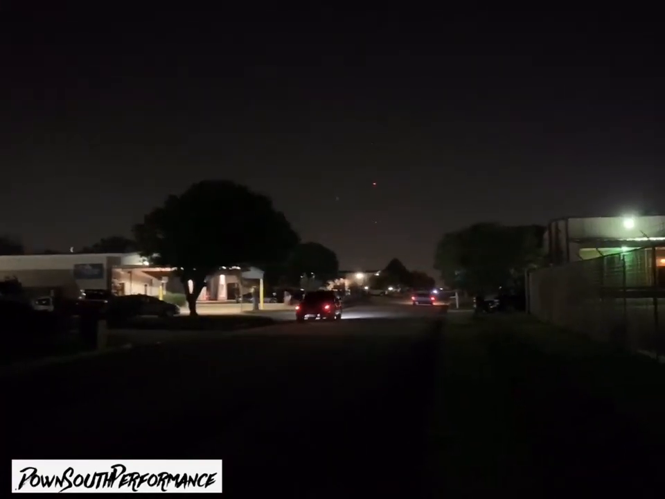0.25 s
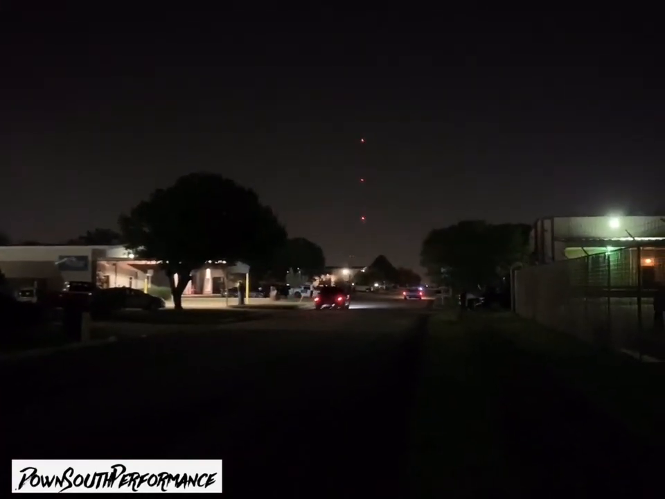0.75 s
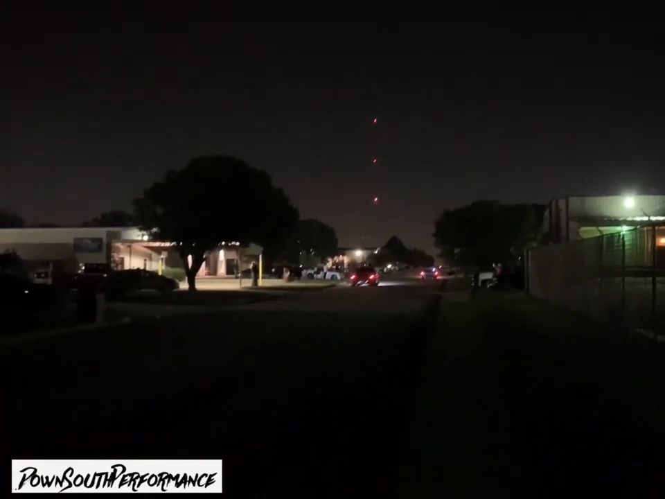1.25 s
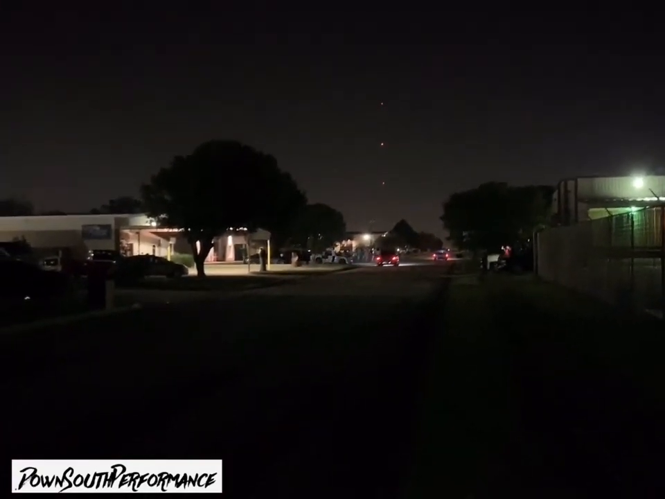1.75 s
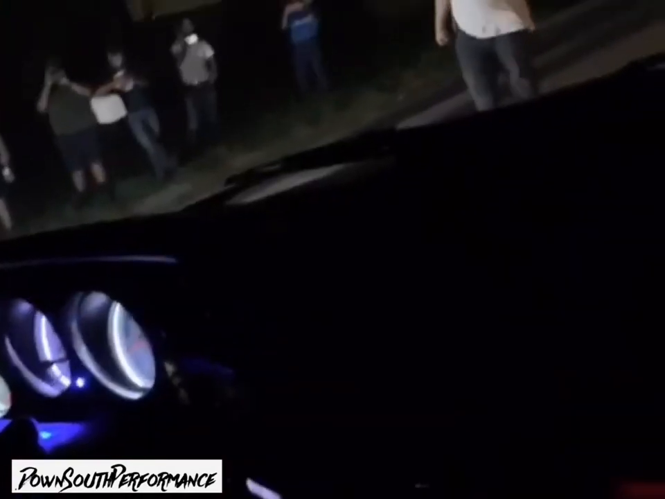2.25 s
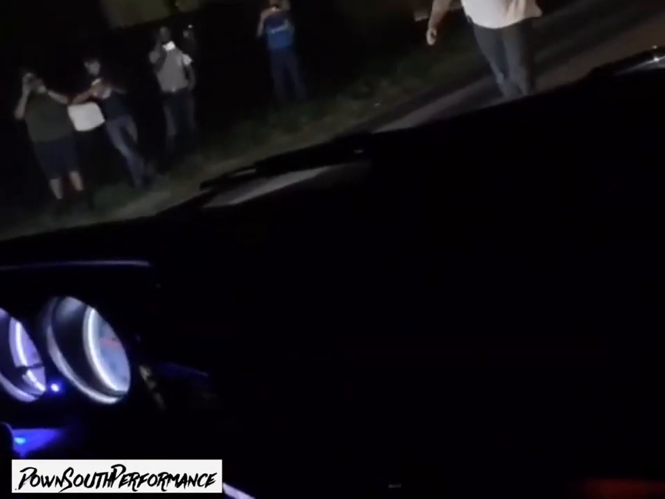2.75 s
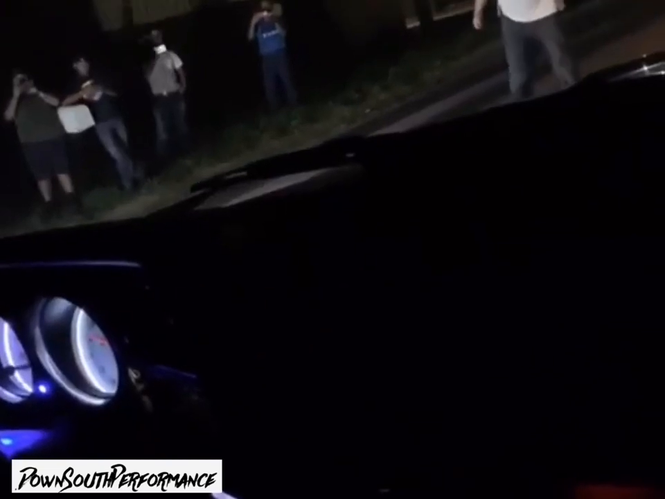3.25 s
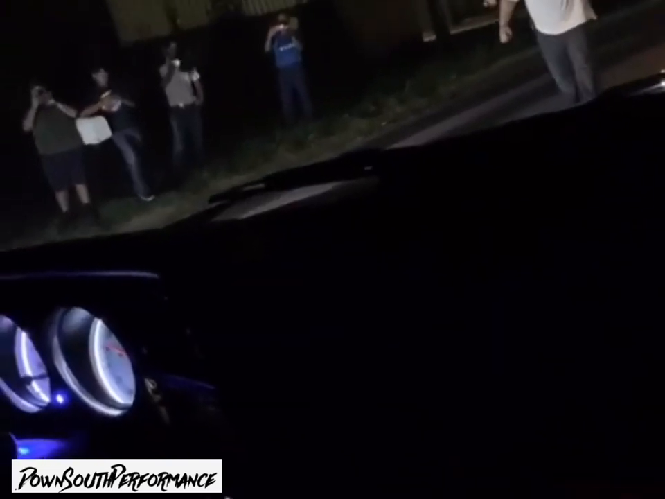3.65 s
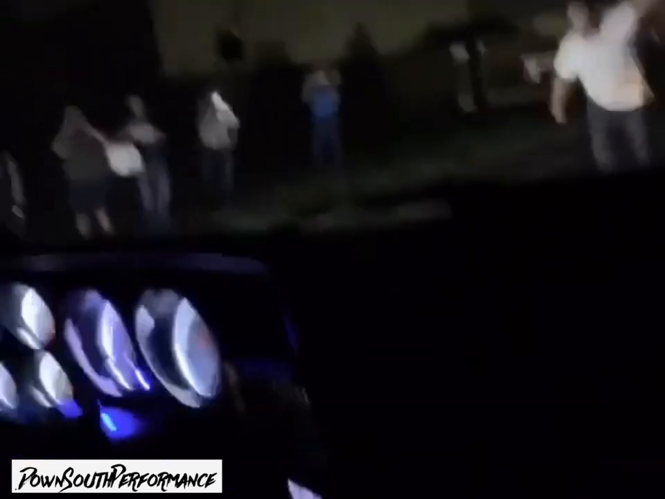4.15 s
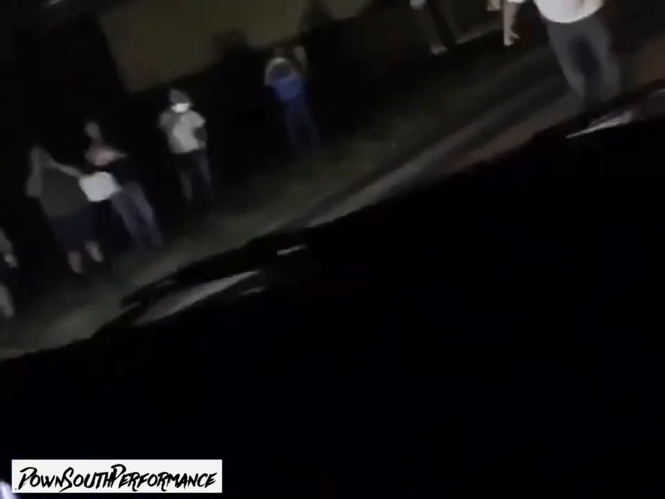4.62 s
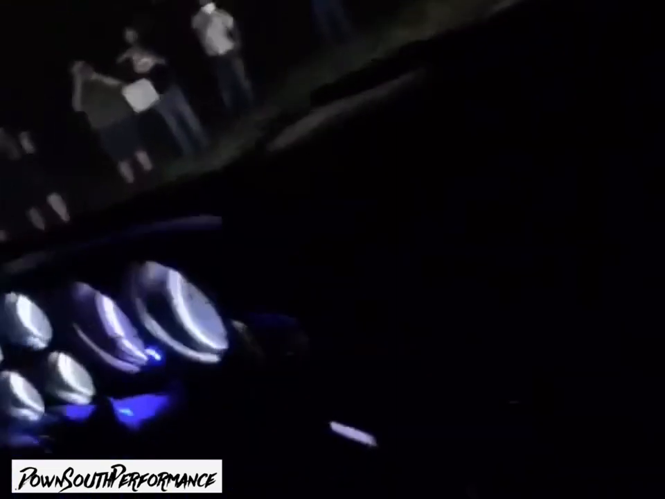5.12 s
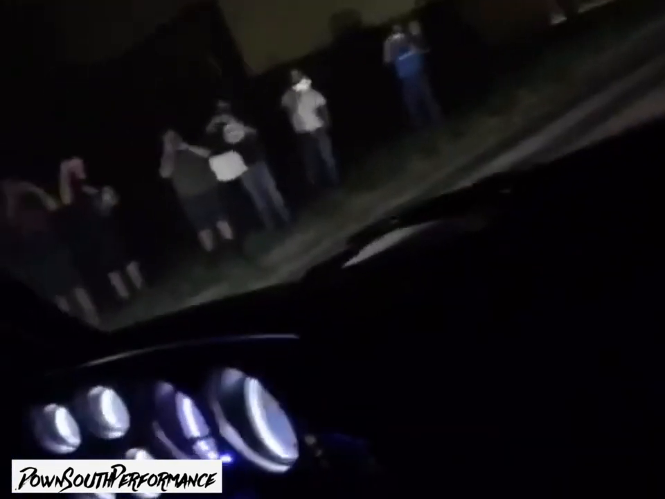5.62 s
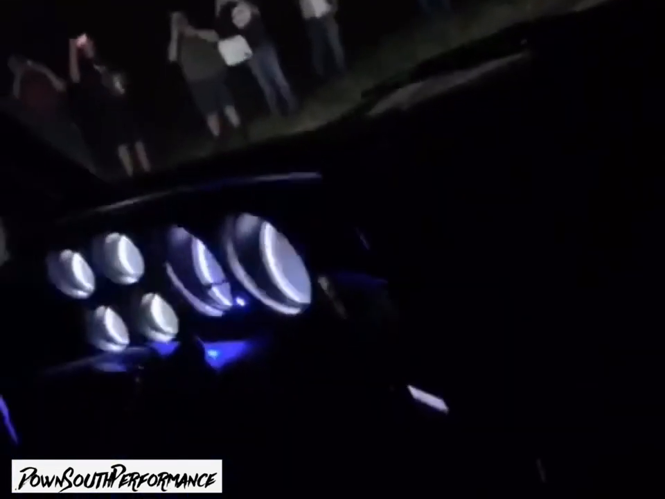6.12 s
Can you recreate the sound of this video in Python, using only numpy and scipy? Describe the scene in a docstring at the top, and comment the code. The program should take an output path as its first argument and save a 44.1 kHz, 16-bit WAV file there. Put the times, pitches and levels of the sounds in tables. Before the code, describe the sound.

Two scenes. First a quiet night street: a far truck's buzzing exhaust pulls away, reflected off buildings, with insects chirring thinly. After a split-second gap, the microphone is inside a car: a heavy V8 climbs quickly with deep, uneven throbbing, swelling as it hits resonances, then dips slightly, rises again and holds steady while intake hiss thins and a loose metal part clinks.

```python
"""An eight-cylinder engine, heard in mono inside a cabin, winds up from low speed and is then held.
Its low notes are sine waves on the engine cycle; air noise and firing clicks ring in panels and
in high resonances. Before it, ahead of a short silence between the two scenes, a far eight-cylinder truck
pulls away in stereo: sine waves and a buzz of clicks, among street roar and insect treble of filtered noise.
Two short metal clinks join the cabin, and a fast limiter holds back the loudest peaks."""
import sys
import numpy as np
from scipy import signal
from scipy.fft import rfft, irfft
from scipy.io import wavfile
from scipy.ndimage import uniform_filter1d, minimum_filter1d

SR = 44100
rng = np.random.default_rng(int(sys.argv[2]) if len(sys.argv) > 2 else 0)


def voltage_ratio(level):
    """Linear amplitude factor for a level in decibels (scalar or array-like)."""
    return 10 ** (np.asarray(level, float) / 20)


def waveform_to_disk(signal):
    """Save audio, clipped to [-1, 1], as 16-bit WAV at the path in sys.argv[1]."""
    frames = np.transpose(np.atleast_2d(signal))
    scaled = np.clip(frames, -1, 1) * 32767
    samples = np.round(scaled).astype(np.int16)
    wavfile.write(sys.argv[1], SR, samples)


N = 281358

# Loudness of the street over time, relative: [t/s, roar level/dB, treble level/dB]
STREET_LEVELS = [(0.0, -32.5, -42.5), (0.264, -36.5, -44.5), (0.364, -43, -50.5), (0.694, -44.5, -52),
                 (0.85, -40.5, -49), (1.4, -39, -47), (1.67, -39.5, -45.5), (1.7, -43.5, -51),
                 (1.98, -37.5, -45)]
# Tone colour of the street, relative: [f/Hz, level/dB per Hz]
STREET_COLOUR = [(25, -21), (60, -19), (110, -3.5), (250, -5), (600, -11.5), (760, -5.5), (1000, -7.5),
                 (1250, -7), (1500, -9), (2000, -10.5), (2400, -16), (3000, -14.5), (4200, -28),
                 (7200, -30), (8300, -28), (9200, -30.5), (10100, -43), (11000, -47.5), (11900, -47),
                 (12600, -46), (14200, -49), (15500, -72.5)]
# Change in level of the street roar above about 1.2 kHz and of the truck's buzz: [t/s, level/dB]
STREET_RASP = [(0, -3.5), (.12, -2.5), (.18, 2.5), (.25, 0), (.36, 2.5), (.52, 4), (.62, -1.5), (.9, 3),
               (1.25, -1.5), (1.45, 1), (1.65, 2.5), (1.78, 1.5), (1.98, 2)]


def rms_one(x):
    """Scale to an average strength (rms) of 1."""
    return x / np.sqrt(np.mean(x ** 2) + 1e-20)


def in_time(rows):
    """Turn each column of a time table into a curve with one value a sample."""
    s, *columns = np.transpose(rows)
    return [np.interp(np.arange(N) / SR, s, c) for c in columns]


def at_hz(points, hz):
    """Read a [f/Hz, value] table on a log frequency axis."""
    table_hz, values = np.transpose(points)
    return np.interp(np.log(np.maximum(hz, 1)), np.log(table_hz), values)


def drift(rate):
    """Slow random wandering with spread 1: noise smoothed above rate (Hz)."""
    hop = 40  # samples between the points that are computed
    r = np.exp(-2 * np.pi * rate * hop / SR)
    noise = rng.standard_normal(N // hop + 2002)
    slow = signal.lfilter([1], [1, -2 * r, r * r], noise)[2000:]  # skip the settling time
    return np.interp(np.arange(N) / hop, np.arange(len(slow)), rms_one(slow))


def coloured(x, spectrum):
    """Shape the spectrum of a signal by a [f/Hz, level/dB] table; rms 1."""
    hz = np.fft.rfftfreq(N, 1 / SR)
    return rms_one(irfft(rfft(x) * voltage_ratio(at_hz(spectrum, hz + 1)), N))


def band(x, low_hz, high_hz):
    """Let only the frequencies between two limits through."""
    return signal.sosfilt(signal.butter(2, [low_hz, high_hz], "band", fs=SR, output="sos"), x)


def lift(x, low_hz, high_hz, db):
    """Raise or lower one broad band."""
    middle = signal.lfilter(*signal.butter(1, [low_hz, high_hz], "band", fs=SR), x)
    return x + (voltage_ratio(db) - 1) * middle


def rings(x, modes, wander_db):
    """The signal plus its ringing in each resonance, each swelling slowly."""
    out = x.copy()
    for hz, width, db in modes:
        r = np.exp(-np.pi * width / SR)
        feedback = [1, -2 * r * np.cos(2 * np.pi * hz / SR), r * r]
        ring = signal.lfilter([(1 - r * r) / 2, 0, (r * r - 1) / 2], feedback, x)
        out += voltage_ratio(db + wander_db * drift(1.04)) * ring
    return out


def scattered(x, decay_s):
    """Dense reflections: each click becomes dying noise; three paths take turns at steady total power."""
    tails = rng.standard_normal((3, 8000)) * np.exp(-np.arange(8000) / (decay_s * SR))
    shares = voltage_ratio(np.array([5 * drift(3) for _ in tails]))
    shares = shares / np.sqrt((shares ** 2).sum(axis=0))
    return sum(signal.fftconvolve(x * share, tail)[:N] for share, tail in zip(shares, tails))


def orders(cycle, levels, waver_db, waver_rad, rate):
    """Sines on (half) multiples of the engine cycle; uneven burning wavers each in level and phase."""
    out = np.zeros(N)
    for k, db in levels:
        phase = 2 * np.pi * (round(2 * k) / 2 * cycle + rng.random()) + waver_rad * drift(rate)
        out += np.sqrt(2) * voltage_ratio(db + waver_db * drift(rate)) * np.sin(phase)
    return out


def firings(turns, uneven_db, spread_s, jitter_db):
    """A click a firing; eight unequal pipes and slowly changing strengths keep every half order alive."""
    timing_slop_s = .00006
    beat = np.cumsum(turns) / SR * 4  # four firings a crank turn
    number = np.arange(1, int(beat[-1]))
    cylinder = number % 8
    at = np.interp(number, beat, np.arange(N))
    strengths = np.array([drift(0.56)[at.astype(int)] for _ in range(8)])[cylinder, number - 1]
    delay_s = spread_s * rng.random(8)[cylinder] + timing_slop_s * rng.random(len(at))
    at = np.minimum(at + SR * delay_s, N - 2)
    size = voltage_ratio(uneven_db * strengths + jitter_db * rng.standard_normal(len(at)))
    # share each click between the two samples nearest to its exact time
    clicks, part = np.zeros(N), at % 1
    np.add.at(clicks, at.astype(int), size * (1 - part))
    np.add.at(clicks, at.astype(int) + 1, size * part)
    return clicks


def far_throttle():
    """The truck's throttle: full (1) at first, then eased to 0."""
    ease_start_s, ease_length_s = 0.23, 0.066
    return np.clip(1 - (np.arange(N) / SR - ease_start_s) / ease_length_s, 0, 1)


def snarl(x):
    """At full throttle the far exhaust rings brighter around 2 kHz."""
    return lift(rms_one(x), 1800, 2200, db=7 * far_throttle())


def street():
    """Roar scattered off the buildings comes in drifting patches; insects chirr in the treble."""
    # Likeness of the two microphone ports: [f/Hz, likeness (1 = the same)]
    likeness = [(60, .99), (500, .997), (1100, .975), (2300, .84), (4700, 0.3), (9000, 0.85)]
    # Left level against right level: [f/Hz, level/dB]
    tilt = [(60, -1.0), (170, 0.0), (460, 0.0), (1270, 2.0), (3500, 0.5), (9660, -2.0)]
    roar_db, treble_db = in_time(STREET_LEVELS)
    rasp_db, = in_time(STREET_RASP)
    mid, side = (coloured(w, STREET_COLOUR) for w in rng.standard_normal((2, N)))
    roar, upper, treble = 0, 0, 0
    edges = 35 * 2 ** np.arange(0, 8.9, 1 / 3)  # third-octave bands, Hz
    for low, high in zip(edges, edges[1:]):
        hz = np.sqrt(low * high)
        alike, lean = np.clip(at_hz(likeness, hz), -1, 1), at_hz(tilt, hz) / 2
        common = np.sqrt(1 + alike) * band(mid, low, high)
        opposite = np.sqrt(1 - alike) * band(side, low, high) * [[1], [-1]]
        pair = (common + opposite) * voltage_ratio(np.array([[lean], [-lean]]))
        if hz < 1250:
            roar = roar + pair * voltage_ratio(0.5 * drift(1.4))
        elif hz < 4500:
            upper = upper + pair * voltage_ratio(1.3 * drift(5))
        else:
            treble = treble + pair
    roar = voltage_ratio(roar_db + 6.5) * rms_one(roar)
    upper = voltage_ratio(roar_db + 4.5 + rasp_db + 3.0 * drift(3.2)) * snarl(upper)
    treble = voltage_ratio(treble_db + 1.3 * drift(26.0)) * rms_one(treble)
    return roar + upper + treble


def far_truck():
    """Clean exhaust orders, a buzz of firings above them, and a note that sags through a gear change."""
    # Engine speed: [t/s, crank turns per s]
    far_speed = [(0, 39.1), (.2, 39), (.33, 38.4), (.5, 37.2), (.64, 36.7), (.83, 36.9), (1.32, 37.93),
                 (1.98, 39.3)]
    # Strong orders, relative: [order, level at eased throttle/dB, gain at full throttle/dB]
    strong_orders = [(3, -43.5, -3.5), (5, -37.5, 6), (8, -45, 17.5), (11, -63.5, 21), (13, -45, 10.5),
                     (16, -41, 4.5), (4, -54.5, 18.5), (6, -38.5, 5.5), (14, -52, 15)]
    # Weaker orders, relative: [order, level/dB]
    weak_orders = [(2.0, -54), (7.0, -40), (9.0, -55.5), (12.0, -49), (15.0, -46), (17.0, -46), (18.0, -41),
                   (21.0, -45.5), (23.0, -47.5), (26.0, -64), ]
    # Second engine note, which sags and climbs again, relative: [t/s, f/Hz, level/dB]
    gear_change = [(0, 545, -42), (.2, 528, -41), (.3, 481, -37), (.4, 435, -36), (.5, 408, -42.5),
                   (.64, 403.7, -39.5), (.83, 409, -40), (1.32, 420, -40), (1.98, 431, -33)]
    turns, = in_time(far_speed)
    cycle = np.cumsum(turns) / SR
    throttle = far_throttle()
    roar_db = in_time(STREET_LEVELS)[0]
    note_hz, note_db = in_time(gear_change)
    note = orders(np.cumsum(note_hz) / SR, [(1, note_db)], waver_db=1.5, waver_rad=.3, rate=8)
    strong_levels = [(k, db + full * throttle) for k, db, full in strong_orders]
    strong = orders(cycle, strong_levels, waver_db=2.5, waver_rad=.35, rate=12)
    weak = orders(cycle, weak_orders, waver_db=2.0, waver_rad=1.0, rate=19.0)
    weak = weak * voltage_ratio(0.36 * (roar_db + 35.5))  # partly follows the street roar
    clicks = firings(turns, uneven_db=-0.5, spread_s=0.00442, jitter_db=2.0)
    buzz = band(coloured(scattered(clicks, decay_s=0.18), STREET_COLOUR), 870, 4100)
    buzz = snarl(buzz) * voltage_ratio(in_time(STREET_RASP)[0])
    return strong + weak + note + voltage_ratio(roar_db - 4) * buzz


def road_bounce(x):
    """A bounce off the road: a softer, later copy, which cuts evenly spaced dips into the spectrum."""
    lag_s, strength = .00204, .42
    return x + strength * np.roll(x, round(lag_s * SR), axis=1)


def clink():
    """A loose metal part chatters: a short burst of noise rings in a few modes."""
    # Clinks, relative: [t/s, level/dB]
    clinks = [(4.429, -12.5), (5.55, -27.5)]
    # Modes of the metal part: [f/Hz, width/Hz, level/dB]
    metal_modes = [(2070, 83, 2), (2250, 80, -1.5), (3810, 54, 4.5), (6070, 73, -9)]
    hold_s, fade_s = .02, .009
    out = 0
    for s, db in clinks:
        since = np.arange(N) / SR - s
        shape = (since > 0) * np.exp(-np.maximum(since - hold_s, 0) / fade_s)
        burst = voltage_ratio(db) * shape * rng.standard_normal(N) + 1e-18
        out = out + rings(burst, metal_modes, wander_db=0) - burst  # keep the ringing alone
    return out


def strands(cycle):
    """Single high engine orders swell up, hold and fade."""
    # Orders that sing out for a while, relative: [order, start t/s, length/s, level/dB]
    singing = [(33, 2.4, 0.19, -40), (27, 3.7, 0.61, -42.5), (32, 4.5, .3, -40), (26.5, 4.72, 0.38, -35.5),
               (22, 4.5, 0.46, -40.5), (20, 6.5, 0.96, -45.5), (30.5, 5.15, .5, -42),
               (36.6, 4.7, 0.47, -43), (27.5, 4.8, 0.49, -45), (23.5, 5.1, 0.54, -41)]
    fade_s = .06
    t = np.arange(N) / SR
    out = 0
    for k, s, length, db in singing:
        shape = np.clip(np.minimum(t - s, s + length - t) / fade_s, 0, 1)
        out = out + shape * orders(cycle, [(k, db)], waver_db=2.5, waver_rad=.6, rate=14)
    return out


def intake_and_panels(turns, cycle, load_db, rasp_db):
    """Intake air and firings ring in the cabin panels, and in high resonances that fade as load drops."""
    # Tone colour of air noise and firings, relative: [f/Hz, level/dB per Hz]
    intake = [(400, -4), (600, 1.5), (800, -1.5), (1050, -4.5), (1400, -6), (1750, -7.5), (2100, -7.5),
              (2700, -10.5), (3500, -13.5), (5000, -17.5), (8600, -15), (9600, -7)]
    # Panel resonances: [f/Hz, width/Hz, level/dB]
    panel_modes = [(790, 35, -3), (895, 40, -9), (960, 40, 0), (1025, 200, 0), (1052, 40, -3),
                   (1145, 35, -4), (1220, 50, -1), (1362, 35, 1), (1490, 40, -2), (1615, 50, 2),
                   (1800, 40, -2)]
    # High resonances that pick out engine harmonics, before the load turns them down:
    # [f/Hz, width/Hz, level/dB]
    high_modes = [(1885, 30, 4), (2178, 30, 4), (2826, 35, 3), (3826, 50, 1)]
    growl = firings(turns, uneven_db=3, spread_s=.004, jitter_db=1.2)
    growl = rms_one(scattered(growl, decay_s=.018))
    throb = 1 + 0.07 * np.sin(2 * np.pi * cycle) + 0.034 * drift(10.0)  # air breathes once a turn
    air = rng.standard_normal(N) * throb + voltage_ratio(1.5) * band(growl, 800, 3000)
    air = coloured(air, intake)
    air = signal.sosfilt(signal.butter(2, 400, "high", fs=SR, output="sos"), air)
    for low in (500, 800, 1300, 2100, 3400, 5500):  # Hz; each band swells on its own
        air = lift(air, low, 1.6 * low, 1.5 * drift(5))
    # below -4.5 dB of load the high ringing falls 2.5 dB for each dB
    high_ringing = rings(air, high_modes, wander_db=0.5) - air
    high_ringing = voltage_ratio(2.5 * np.minimum(load_db + 4.5, 0)) * high_ringing
    panels = rms_one(rings(air, panel_modes, wander_db=2.2) + high_ringing)
    return lift(panels, 1350, 3200, rasp_db)


def cabin_air(cycle, load_db, below_held, lope):
    """Weaker engine orders and low rumble ring in the air of the cabin."""
    # Weaker orders at held speed and 0 dB load, before the air modes: [order, level/dB]
    weak_orders = [(1.5, -31.5), (2.0, -37), (3.5, -34.5), (4.5, -44), (6.5, -36.5), (10.5, -44.5),
                   (11.0, -44), (11.5, -39.5), (12.5, -47), (13.5, -46.5), (14.0, -49.5)]
    # Tone colour of the rumble, relative: [f/Hz, level/dB per Hz]
    rumble_colour = [(20, -37), (40, -2.5), (130, -15.5), (210, -11.5), (340, -18.5), (480, -16),
                     (650, -10)]
    # Air modes: [f/Hz, width/Hz, level/dB]
    air_modes = [(122, 78, 0), (159.5, 15, 9), (205.6, 25, 8.5), (315, 37.4, 9.5), (410, 38, 9)]
    weak = orders(cycle, weak_orders, waver_db=4.5, waver_rad=0.43, rate=2.56)
    weak = weak * voltage_ratio(load_db - 0.13 * below_held)
    rumble = rms_one(band(coloured(rng.standard_normal(N), rumble_colour), 41, 338))
    rumble = rumble * voltage_ratio(load_db - 24.5 + 1.5 * drift(3) + .45 * lope)
    return rings(weak + rumble, air_modes, wander_db=4.5)


def boom_db(hz):
    """Gain of the steep resonances at a moving frequency; it falls away quickly below the lowest."""
    # Exhaust and body resonances: [f/Hz, width/Hz, level/dB]
    booms = [(40.2, 18, 0), (87, 41, -1.5), (122.4, 19.7, 13), (187.9, 9.3, 8.5), (203.9, 18, 5.5),
             (285, 92, -7.5), (320.3, 9, 10), (346.7, 13.8, 12.5), (411.4, 22.5, 13.5), (536, 25.5, 12)]
    peaks = sum(voltage_ratio(db) / (1 + (2 * (hz - at) / width) ** 2) for at, width, db in booms)
    between = voltage_ratio(-29) * np.minimum(hz / booms[0][0], 1) ** 4
    return 20 * np.log10(peaks + between)


def engine_boom(turns, cycle, load_db, below_held, lope):
    """Strong low orders swell as the engine speed sweeps them through the resonances."""
    # Strong orders at held speed and 0 dB load, before the resonances:
    # [order, level/dB, gain for each turn per s below held speed/dB]
    strong_orders = [(1, -19.5, -0.07), (2.5, -27.5, -0.35), (3, -20, -1.2), (4, -16, 0.43),
                     (5, -22.5, 0.2644), (5.5, -31, .5), (6, -27, 0.26), (8.5, -38, 0.77), (9, -36, 0.37),
                     (7, -30, -0.07), (7.5, -35, 0.48), (8, -28.5, 0.03), (9.5, -34, -0.02),
                     (10, -31.5, -0.5), (12, -40.5, -1)]
    levels = [(k, load_db + db + slope * below_held + boom_db(k * turns)) for k, db, slope in strong_orders]
    return orders(cycle, levels, waver_db=1.2 + .3 * lope, waver_rad=.15, rate=10)


def cabin_engine():
    """Low orders boom in the cabin; firings and intake air ring in panels and high resonances."""
    # Engine speed: [t/s, crank turns per s]
    near_speed = [(2.04, 17), (2.18, 20.7), (2.46, 29.8), (2.6, 33.9), (2.76, 36.4), (3.16, 41.7),
                  (3.3, 42.7), (3.44, 42.86), (3.86, 42.45), (4, 41.95), (4.14, 40.85), (4.28, 40.7),
                  (4.56, 44), (4.7, 45.4), (4.84, 46.05), (4.98, 46), (5.34, 44.7), (5.68, 44.63),
                  (5.96, 44.2), (6.38, 44.4)]
    # Engine load and air noise, relative: [t/s, load level/dB, air level/dB, lift of its rasp/dB]
    near_levels = [(2.04, -4, -27.5, -2), (2.17, -6, -21.5, -2), (2.4, 1, -20.5, 0.5),
                   (2.5, -6.5, -24.5, -3.5), (2.56, 0, -19, -3), (2.9, -0.5, -19, -6.5), (3.4, 1, -19, -3),
                   (3.9, -4, -24, -1.5), (4.05, -4, -26, -2), (4.17, -5.5, -27, -4.5),
                   (4.38, -5, -24.5, -5.5), (4.5, -4.5, -25, -2), (5.03, -6.5, -29.5, 2.5),
                   (5.16, -7, -29.5, -1), (5.7, -7.5, -30.5, 1.5), (6.38, -7, -30.5, -1.5)]
    turns, = in_time(near_speed)
    load_db, air_db, rasp_db = in_time(near_levels)
    cycle = np.cumsum(turns) / SR
    below_held = 43 - turns  # turns per s below the held speed
    lope = np.maximum(27 - turns, 0)  # burning is uneven below 27 turns per s
    boom = engine_boom(turns, cycle, load_db, below_held, lope)
    low_air = cabin_air(cycle, load_db, below_held, lope)
    panels = intake_and_panels(turns, cycle, load_db, rasp_db)
    return boom + strands(cycle) + low_air + voltage_ratio(air_db) * panels


def smear(x, pole, count):
    """All-pass chain (phase rotator) on the cabin sound: lows lag, so a step comes out as a falling chirp."""
    a = np.clip(pole, 0, .98)
    for _ in range(count):
        x = signal.lfilter([-a, 1], [1, -a], x)
    return x


def scene():
    """The street scene, a short silence, then the cabin scene."""
    # Silence between the scenes: [start t/s, end t/s]
    silence = (1.981, 2.0318)
    # Gain of the street scene between 1.3 and 1.7 kHz: [t/s, level/dB]
    street_swell = [(0, -3), (.12, -0.5), (.2, 2.5), (.3, -3.5), (.55, -5), (.8, 3.5), (1, 8), (1.12, 2.5),
                    (1.27, 6), (1.4, 2), (1.55, -1), (1.66, 6.5), (1.78, 4.5), (1.98, 1.5)]
    t = np.arange(N) / SR
    outside = far_truck() * voltage_ratio(np.array([[.3], [-.3]])) + street()
    outside = lift(outside, 1300, 1700, in_time(street_swell)[0])
    left, right = road_bounce(outside)
    outside = np.array([left, np.roll(right, 4)])  # the left port hears first
    outside = voltage_ratio(-1.0) * outside * (t < silence[0])
    inside = (cabin_engine() + clink()) * (t > silence[1])
    # the cut into the cabin lands mid-swing: a sudden step that dies away
    step_start = round(silence[1] * SR) + 1
    inside[step_start:][:900] += 2.2 * np.exp(-np.arange(900) / 32)
    inside = smear(inside, pole=.91, count=9)
    # steep low-pass: 80 dB down from 9.9 kHz
    inside = signal.sosfilt(signal.cheby2(16, 80, 9900, fs=SR, output="sos"), inside)
    return outside + inside


def top_cut(x):
    """Nothing passes above the cut-off."""
    return signal.sosfilt(signal.butter(12, 15300, fs=SR, output="sos"), x)


def record(dry):
    """A fast limiter holds the peaks just under full scale and ducks the hiss with them."""
    ceiling = .997
    need = 1 / np.maximum(1, np.abs(dry).max(axis=0) / ceiling)
    gain = uniform_filter1d(minimum_filter1d(need, size=661), size=331)
    return top_cut(dry * gain)


dry = scene()
out = record(dry)
waveform_to_disk(out)
```